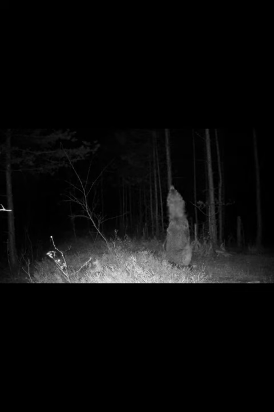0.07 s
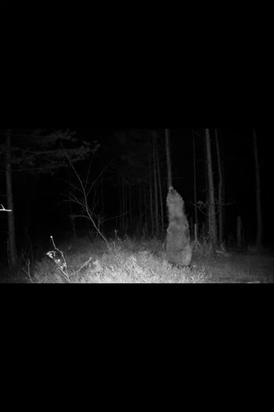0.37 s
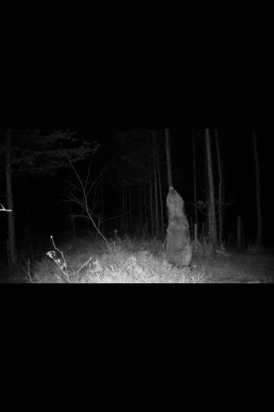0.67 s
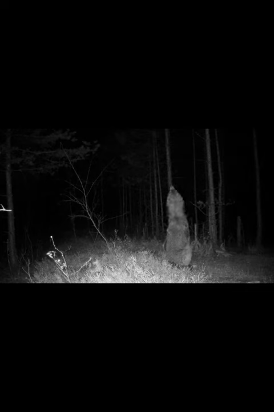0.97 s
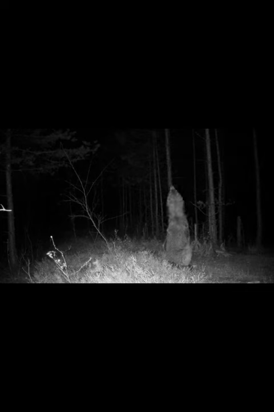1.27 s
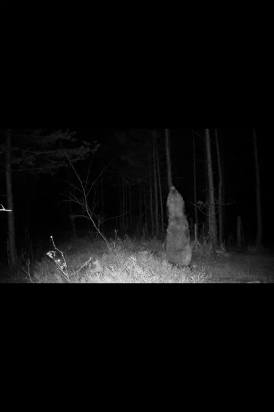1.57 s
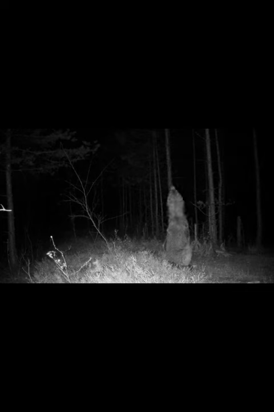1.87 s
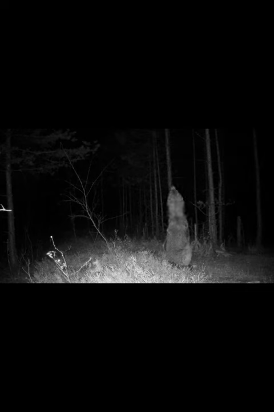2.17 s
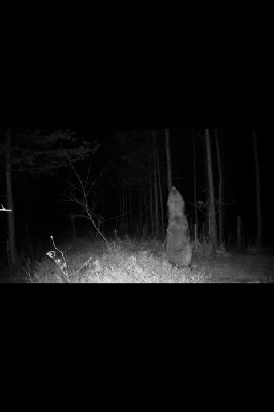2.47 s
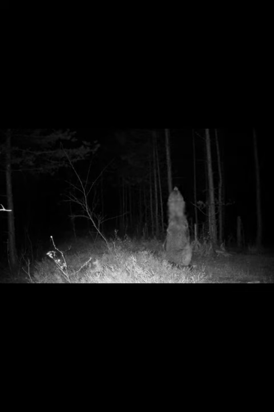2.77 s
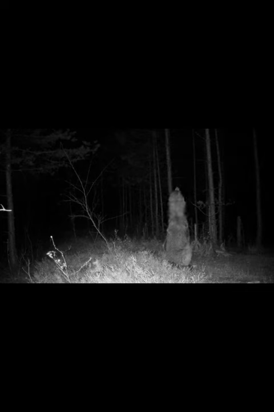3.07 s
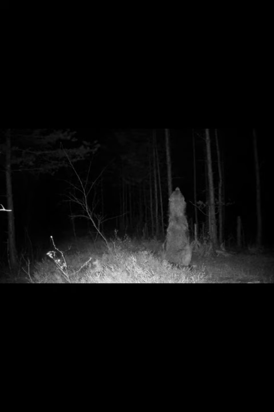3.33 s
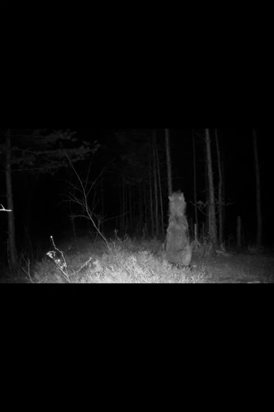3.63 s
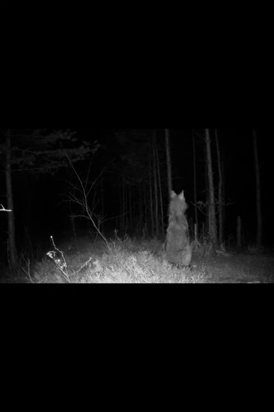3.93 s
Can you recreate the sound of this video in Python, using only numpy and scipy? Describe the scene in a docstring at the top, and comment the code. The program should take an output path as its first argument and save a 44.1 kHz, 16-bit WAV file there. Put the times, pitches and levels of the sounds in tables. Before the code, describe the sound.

A wolf holds one long, sinking howl while other wolves call faintly far away.

```python
"""Night forest, with a low rumble of air and the hiss of the camera's microphone throughout.
A near wolf is already in one long, nearly pure howl, and the trees return a faint echo.
Far off, other wolves call through the first two seconds. The howl sinks in pitch and fades,
and by 3 s the tiring voice is unsteady. Short distant answers follow, some of them hoarse,
and the near wolf stops just before 4 s."""
import sys
import numpy as np
from scipy import signal
from scipy.fft import rfft, irfft
from scipy.io import wavfile

SR = 44100
rng = np.random.default_rng(int(sys.argv[2]) if len(sys.argv) > 2 else 0)


def dump_mix(stems):
    """Bounce the given channels to the path in sys.argv[1] as a 16-bit WAV at rate SR."""
    frames = np.atleast_2d(stems).T  # one column per channel
    limited = np.clip(frames, -1, 1)  # hard clip at full scale
    pcm = np.round(limited * 32767).astype(np.int16)
    wavfile.write(sys.argv[1], SR, pcm)


N = 176400

# Spectrum of night air and hiss at the microphone: f/Hz, relative level per Hz/dB
AIR_SPECTRUM = [(15, 4.5), (30, 1), (60, -5), (120, -9.5), (220, -14), (450, -15), (750, -18.5),
                (1200, -22.5), (2000, -27), (3000, -32.5), (4000, -41), (5100, -48), (6000, -42.5),
                (7100, -37), (8000, -43), (8600, -50.5)]
# Calls from far off: start t/s, end t/s, first f/Hz, held f/Hz, fundamental level/dB before the trees,
# 2nd and 3rd harmonic level/dB against the fundamental, roughness (0-1)
FAR_CALLS = [(-.2, 0.757, 541, 518, -67, -11, -29.5, 0.22), (-.2, 0.557, 396, 390.7, -74.5, -0.5, -9, .05),
             (.7, 1.82, 508, 526.3, -73.5, -13.5, -30.5, 0.12), (0.747, 1.76, 555, 561, -73, -17, -26, 0.1),
             (3.36, 3.51, 305, 326.6, -68, -2, -12, .36), (3.66, 3.83, 419, 468.3, -75.5, -2, -3, .9),
             (3.761, 3.965, 572, 520, -68, -19, -22, .55),
             (3.72, 4.1, 571.6, 409.8, -66.5, -8.5, -14.5, .16)]
# The near howl: t/s, f/Hz, level/dB of harmonics 1, 2, 3 and 4
HOWL_CONTOUR = [(0.03, 318.2, -39, -55, -54.5, -67.5), (0.1, 317, -39.5, -50.5, -53, -72),
                (0.45, 315.1, -39.5, -54, -54, -70), (0.64, 313.1, -41, -48, -51.5, -71),
                (0.73, 313, -41, -44.5, -51.5, -77), (0.79, 311.2, -40.5, -44.5, -55, -72),
                (0.97, 305.9, -40.5, -47, -49, -74.5), (1.32, 301.9, -42, -41.5, -48, -76),
                (1.51, 300, -43.5, -45, -51.5, -77.5), (2.0, 293.4, -44, -45, -47.5, -69),
                (2.29, 290.8, -46, -50, -53, -72.5), (2.41, 286, -48, -52.5, -61, -71.5),
                (2.58, 284, -49.5, -55, -64, -76), (2.66, 278, -49, -51.5, -59.5, -74),
                (2.82, 263, -51.5, -61.5, -65, -68), (3.02, 255.7, -55, -64.5, -64, -66),
                (3.12, 257, -56, -60, -66, -69), (3.16, 257.7, -56, -75, -71, -71),
                (3.22, 264.4, -54, -62.5, -69, -74), (3.29, 267.8, -55, -71, -77.5, -90),
                (3.35, 270.8, -56.5, -74, -80, -92), (3.47, 267, -57, -72, -82.5, -93),
                (3.55, 259.5, -57.5, -82, -72, -78.5), (3.76, 254, -58, -66, -75.5, -79.5),
                (3.81, 257, -60.5, -73, -82, -91), (3.86, 260, -78, -92, -95, -99)]
# Its weak upper harmonics: harmonic number, level/dB against the 3rd
HOWL_OVERTONES = [(5, -38), (6, -42), (8, -45.5)]

BACKGROUND_DB, RUMBLE_SWELL_DB, RUMBLE_HZ = -64.5, -1.5, 111
CALL_GLIDE_S, CALL_EDGE_S, CALL_WAVER = .04, .0088, .005
ROUGH_JITTER, ROUGH_HZ = .15, 113  # pitch scatter of a fully rough call, and its speed
FAR_T60_S, FAR_BUILD_S, FAR_WET_DB = .37, .023, -1
ECHO_DB, ECHO_T60_S, ECHO_BUILD_S, ECHO_HZ = -19.5, 1.5, .03, 714
FADE_IN_S, STOP_S, RELEASE_S, TIRED_S = .0016, 3.87, .03, 3.0
JITTER, TIRED_JITTER, JITTER_HZ = .0022, .004, 69.5  # pitch scatter, extra when tired, speed
SHIMMER_DB, SHIMMER_HZ, FLUTTER_DB, FLUTTER_HZ = .21, 29.3, 1.24, 24
THROAT_HZ, THROAT_Q = 814, 2.3
TOP_HZ = 8450


def undb(db):
    """Decibels to gain."""
    return 10 ** (np.asarray(db) / 20)


def unit(x):
    """Scale to rms 1."""
    return x / np.sqrt(np.mean(x ** 2))


def drift(rate_hz):
    """Smooth random drift up to about rate_hz, spread 1."""
    hz = np.arange(N // 2 + 1) * SR / N
    return unit(irfft(rfft(rng.standard_normal(N)) * np.exp(-(hz / rate_hz) ** 2), N))


def tone(phase, db):
    """A pure tone of the given rms level."""
    return np.sqrt(2) * undb(db) * np.cos(phase)


def night_air():
    """The bed of the place: steady microphone hiss over a rumble of air that swells a little."""
    hz = np.maximum(np.arange(N // 2 + 1) * SR / N, 1)
    points_hz, db = np.array(AIR_SPECTRUM).T
    spectrum = rfft(rng.standard_normal(N)) * undb(np.interp(np.log(hz), np.log(points_hz), db))
    bass_share = 1 / (1 + (hz / RUMBLE_HZ) ** 2)
    rumble = irfft(spectrum * bass_share, N) * undb(RUMBLE_SWELL_DB * drift(rate_hz=8.9))
    hiss = irfft(spectrum * (1 - bass_share), N)
    return undb(BACKGROUND_DB) * unit(rumble + hiss)


def forest_echo(x, t60_s, build_s):
    """Scatter from the trunks all around: a dense, dying tail, strongest in the middle range."""
    t = np.arange(N) / SR
    decay = np.exp(-np.log(1000) * t / t60_s)
    build_up = 1 - np.exp(-(t / build_s) ** 2)
    tail = rng.standard_normal(N) * decay * build_up
    tail /= np.sqrt(np.sum(tail ** 2))
    tail = signal.lfilter(*signal.iirpeak(ECHO_HZ, Q=.7, fs=SR), tail)
    return signal.fftconvolve(x, tail)[:N]


def far_wolves(t):
    """Far off, each call slides onto its note and wavers, clear or hoarse, blurred by the trees."""
    calls = np.zeros(N)
    for start, end, first_hz, held_hz, db, second_db, third_db, rough in FAR_CALLS:
        hz = held_hz + (first_hz - held_hz) * np.exp(-np.maximum(t - start, 0) / CALL_GLIDE_S)
        hz *= 1 + CALL_WAVER * drift(rate_hz=25) + rough * ROUGH_JITTER * drift(ROUGH_HZ)
        phase = 2 * np.pi * np.cumsum(hz) / SR
        gate = np.clip(np.minimum(t - start, end - t) / CALL_EDGE_S, 0, 1)
        for k, relative_db in enumerate((0, second_db, third_db), 1):
            calls += gate * tone(k * phase, db + relative_db)
    wet = undb(FAR_WET_DB)
    return (calls + wet * forest_echo(calls, FAR_T60_S, FAR_BUILD_S)) / np.hypot(1, wet)


def near_wolf(t):
    """Nearest the microphone: clean harmonics on one sinking pitch, unsteady as the voice tires."""
    when, pitch_hz, *harmonic_db = np.array(HOWL_CONTOUR).T
    tired = np.minimum(t / TIRED_S, 1) ** 6
    jitter = (JITTER + TIRED_JITTER * tired) * drift(JITTER_HZ)
    hz = np.interp(t, when, pitch_hz) * (1 + jitter)
    phase = 2 * np.pi * np.cumsum(hz) / SR
    levels = [np.interp(t, when, db) for db in harmonic_db]
    voice = np.zeros(N)
    for k, db in enumerate(levels, 1):
        shimmer_db = k * SHIMMER_DB * drift(SHIMMER_HZ)
        flutter_db = (k > 1) * tired * FLUTTER_DB * drift(FLUTTER_HZ)
        voice += tone(k * phase, db + shimmer_db + flutter_db)
    for k, relative_db in HOWL_OVERTONES:
        voice += tone(k * phase, levels[2] + relative_db + 2 * drift(rate_hz=4))
    # All-pass: the throat resonance delays the harmonics near it.
    _, throat = signal.iirpeak(THROAT_HZ, THROAT_Q, fs=SR)
    gate = np.clip(np.minimum(t / FADE_IN_S, (STOP_S - t) / RELEASE_S), 0, 1)
    return gate * signal.lfilter(throat[::-1], throat, voice)


def scene():
    """At one microphone among the trees: the near wolf, its echo, the far pack and the night air."""
    t = np.arange(N) / SR
    howl = near_wolf(t)
    echo = undb(ECHO_DB) * forest_echo(howl, ECHO_T60_S, ECHO_BUILD_S)
    return (howl + echo + far_wolves(t) + night_air())[None]


def record(dry):
    """The camera cuts the top steeply."""
    return signal.sosfilt(signal.ellip(8, .2, 70, TOP_HZ, fs=SR, output="sos"), dry)


dry = scene()
out = record(dry)
dump_mix(out)
```